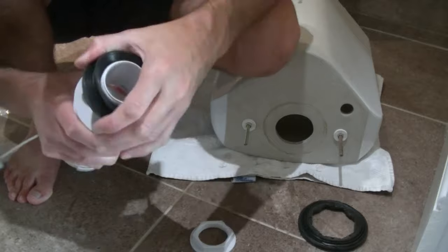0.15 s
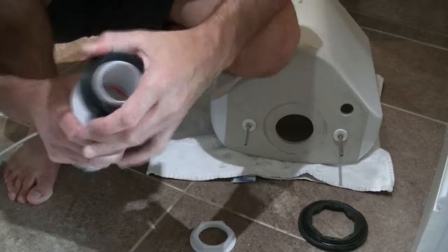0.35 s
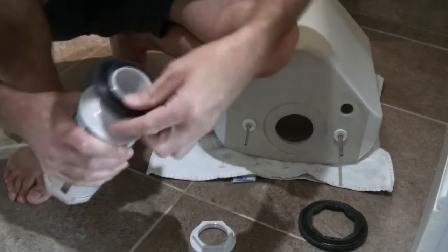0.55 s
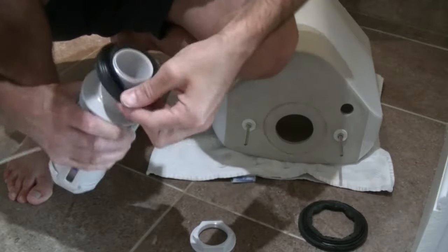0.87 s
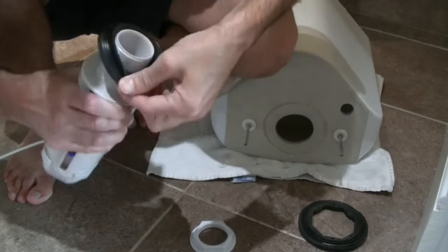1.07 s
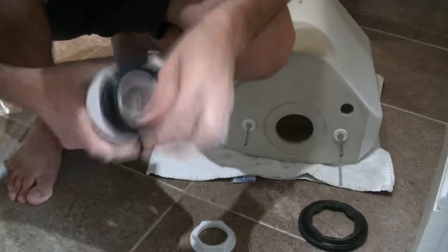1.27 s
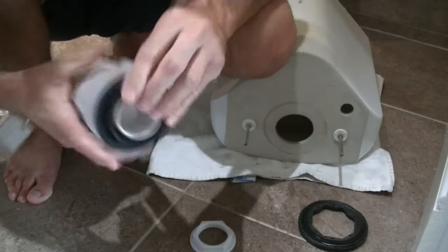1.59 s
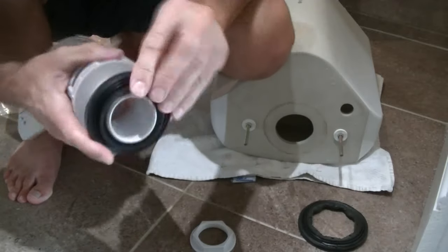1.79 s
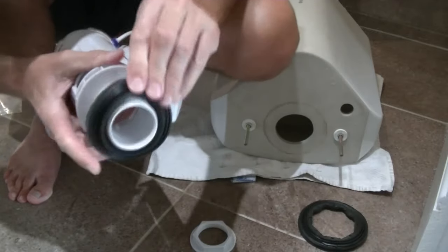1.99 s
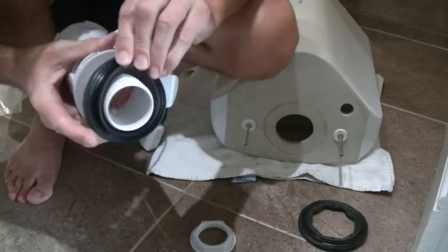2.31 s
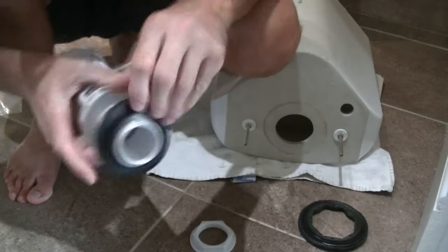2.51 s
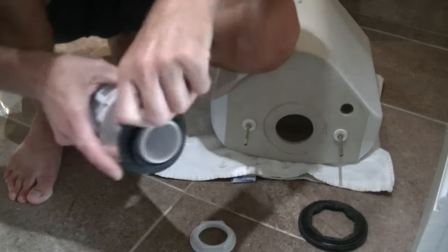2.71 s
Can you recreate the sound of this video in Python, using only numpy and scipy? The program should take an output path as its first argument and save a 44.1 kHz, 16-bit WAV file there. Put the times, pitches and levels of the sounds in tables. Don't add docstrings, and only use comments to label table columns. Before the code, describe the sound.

Close handling of plastic and rubber: an opening clack and rub, scattered ticks, a thick run of hollow clacks and gritty strokes, a quiet gap, then a final burst, with short hard-room reverberation and faint hum.

```python
import sys
import numpy as np
from scipy import signal
from scipy.fft import rfft, irfft
from scipy.io import wavfile
from scipy.ndimage import map_coordinates

SR = 44100
rng = np.random.default_rng(int(sys.argv[2]) if len(sys.argv) > 2 else 0)


def to_wav(s):
    ch = np.atleast_2d(s).T
    pcm = np.round(np.clip(ch, -1, 1) * 32767)
    wavfile.write(sys.argv[1], SR, pcm.astype(np.int16))


def boost_factor(decibels):
    exponent = np.asarray(decibels, float) / 20
    return 10 ** exponent


N = 125685

# start_s, peak_db, ring_hz, brightness_db, mouth_ring_db
FIRM_CLACKS = [(-0.0007, 4, 3650, 2.5, -12), (0.4832, -1, 2890, 2.5, 3), (0.5246, -17, 3900, -4, -6),
               (0.5402, 1, 3750, -6, -2), (0.6472, -1, 3690, 3, 4), (1.1649, -3, 4500, 12, 4),
               (1.1908, -3.5, 3830, -7, 1.5), (1.2292, -3.5, 3020, 11, -5), (1.2412, -3, 4160, -1, -12),
               (1.2727, -7.5, 3760, -4, 14), (1.3917, -1.5, 3130, 8.5, -1.5), (1.4005, -7, 3300, 6, -6),
               (1.5348, -3.5, 3130, -6, 13), (1.6879, -15, 3200, 4, 6), (1.7088, -8.5, 4230, -4, 2),
               (1.82, -7.5, 3590, -0.5, 1), (1.9913, -3, 3440, 2, 13.5), (2.0269, -1, 4990, 18.5, -4),
               (2.0763, 1.5, 2500, 4.5, 0.5), (2.1455, 0.5, 4100, 6, -0.5), (2.5552, -5, 4470, 0, -13),
               (2.5781, -4.5, 2510, -10, 2), (2.5925, -5, 4290, -18, 15)]
# ring_hz, level_db
SECOND_RINGS = [(4920, 3.5), (4130, 17), (3030, 17), (2750, -11), (5460, 5), (5100, -2), (2300, 9),
                (4290, 20), (2830, 15), (4420, 14), (4000, 4), (2840, 21), (3830, -3), (4120, 8), (3740, 6),
                (1890, 6), (4600, 12), (7600, 5), (3400, 12), (1580, 19), (3860, 6), (1940, 5), (2900, 5)]
# start_s, peak_db, ring_hz, brightness_db, mouth_ring_db
LIGHT_TICKS = [(0.1775, -11, 3030, -10, -12), (0.2134, -33, 3220, 3, -2), (0.556, -16, 3940, 6, -3),
               (1.3205, -11.5, 3300, -23, -14), (0.4406, -11.5, 2820, -1, 6), (0.452, -11.5, 2820, -14, 10),
               (1.4165, -9.5, 2850, -12, 4), (1.255, -10, 4300, -13, -9), (1.2915, -9, 3700, 3, 3),
               (0.6711, -23, 3770, -2, -12), (0.728, -8, 2790, -10, -2), (0.7455, -9.5, 3630, -14, -12),
               (0.8928, -27.5, 4450, -19, -11), (0.9775, -30, 3060, -9, 4), (1.0615, -20, 4070, -14, -3),
               (1.7127, -9.5, 4100, -5, 2), (1.0563, -18, 4200, -19, 11), (1.1272, -14, 2920, 13, 3),
               (1.214, -8, 2750, -16, -11), (1.4996, -23, 4270, -8, -8), (1.555, -5, 3900, -3, -2),
               (1.7558, -12, 3580, 8, -5), (2.062, -18, 4960, -8, 8), (2.2262, -7, 4230, -11, 17),
               (2.567, -7.5, 2730, -4, 2), (2.3637, -29, 3700, 6, -4), (2.4148, -26, 2920, -1, 14),
               (2.462, -29, 3540, 0.1, -1), (2.4877, -31, 2370, -18, -1), (2.51, -27.5, 3700, 10, 7),
               (2.6313, -8, 4200, 2, 10.5)]
# start_s, length_s, level_db, brightness_db, thump_db
RUBBER_STROKES = [(0.003, 0.054, -24.5, -14, 0), (0.162, 0.067, -27, -17, -1), (0.238, 0.12, -42.5, -2, 14),
                  (0.412, 0.078, -37, -3, 11), (0.481, 0.083, -22, -5, 3.5), (0.655, 0.071, -26, -10, -2),
                  (0.702, 0.11, -31, -13.5, 0.5), (0.887, 0.026, -34, -18, 10), (1.046, 0.054, -34, -19, 6),
                  (1.206, 0.074, -23, -5, -15), (1.279, 0.055, -21, -7, 5.5), (1.386, 0.043, -18.5, -1, 1),
                  (1.473, 0.1, -28.5, -6, 6), (1.526, 0.034, -17, -4, 6), (1.684, 0.039, -24, -4, 10.5),
                  (1.722, 0.022, -19, 3, 2), (1.749, 0.044, -22, -8, 3.5), (2.072, 0.058, -25, 9.5, 14.5),
                  (2.149, .11, -25, -2.7, 4), (2.32, 0.031, -40.5, -5, 6), (2.41, 0.16, -49, -20, 11),
                  (2.531, 0.055, -29, -5, 12), (2.546, 0.052, -19.5, -3, 1.5),
                  (2.588, 0.036, -21.5, 6.5, 5), (2.834, .05, -47, -36, -11)]
# ring_hz, ring_db, mouth_ring_db
HAND_GRIPS = [(4200, 5, 4.5), (3060, 5.5, 5.5), (1956, 17.5, -12), (2820, 12, 6.5), (2870, 11.5, 6.5),
              (3650, 5.5, -4), (2960, 5, -11), (1905, 17, -10), (2360, 5, -2), (4210, 0.5, 5.5),
              (3190, 12.5, 10.5), (2820, -1, 7.5), (3980, -2, -2), (3930, 3, -6), (3020, 9, 0),
              (3300, 13, -4), (1930, 11.5, -9), (3550, 10, 1), (3690, 2, 4.5), (4230, -2, 0),
              (2100, 10, -7.5), (2540, 7, 6.5), (2450, -2.5, 6), (4290, 4, -6), (1940, -1, -11)]
# pitch_hz, level_db (per Hz)
BODY_COLOUR = [(24, -59), (40, -48.5), (770, -21), (1440, -7.5), (1720, -5), (2100, -3), (3740, -3.5),
               (8550, -18.5), (16000, -28.5)]
# ring_hz, width_hz, level_db
TUBE_RINGS = [(2750, 105, 2.5), (3700, 590, 2.5), (4330, 400, 3), (4990, 1700, 6.5), (7110, 120, 7),
              (8490, 2400, 7.5)]
# pitch_hz, t60_s
ROOM_DECAY = [(300, 0.43), (1300, 0.37), (3500, 0.34), (9000, 0.3), (15000, 0.19)]
# pitch_hz, likeness (0 to 1)
ROOM_ALIKE = [(300, 0.79), (1000, 0.95), (2500, 0.85), (5000, 0.71), (10000, 0.12)]
# pitch_hz, level_db (per Hz)
HUM_COLOUR = [(15, -42), (25, -12), (229, -1.5), (575, -5), (936, -19), (1070, 0), (1940, -8.5), (4370, 0),
              (16000, -23.5)]
# pitch_hz, likeness (0 to 1)
HUM_ALIKE = [(40, 0.36), (150, 0.022), (500, 0.09), (8000, 0.5)]

MOUTH_HZ, MOUTH_WIDTH_HZ = 1750, 530
CONTACT_WIDTH_HZ = 330
SPAN = 32768
HZ = np.fft.rfftfreq(SPAN, 1 / SR)


def clacks():
    rise_s, t60_s, level_db = 0.0006, 0.018, -11.5
    snap_db, own_ring_db, thump_db, wet_db = 19, 13, -5, -1.5
    events = list(FIRM_CLACKS) + list(LIGHT_TICKS)
    start_s, peak_db, ring_hz, bright_db, mouth_db = np.transpose(events)

    t = np.arange(SR // 20) / SR
    shape = (1 - np.exp(-t / rise_s)) ** 3 * boost_factor(-60 * t / t60_s)
    snap_at = shape.argmax()
    noise = rng.standard_normal((len(events), 2, len(t))).swapaxes(0, 1)
    chatter = noise * shape / shape.max()
    chatter[0, :, snap_at] = boost_factor(snap_db)
    drive = boost_factor(peak_db + level_db)[:, None] * chatter

    rings = own_ring_db * bump(ring_hz[:, None], CONTACT_WIDTH_HZ)
    rings += mouth_db[:, None] * bump(MOUTH_HZ, MOUTH_WIDTH_HZ)
    other_hz, other_db = np.transpose(SECOND_RINGS)[..., None]
    rings[:len(FIRM_CLACKS)] += other_db * bump(other_hz, CONTACT_WIDTH_HZ)
    colour = tube_colour(bright_db, np.full(len(events), thump_db), rings)
    return in_room(start_s - snap_at / SR, drive, colour, wet_db)


def rubs():
    slips_per_s, slip_spread_db, slip_s = 450, 10, 0.0017
    hiss_share, clump_db, clumps_per_s = 0.28, 2, 40
    rise_s, fall_s, wet_db = 0.013, 0.024, -0.7
    start_s, length_s, level_db, bright_db, thump_db = np.transpose(RUBBER_STROKES)
    count = len(start_s)

    t = np.arange(SR // 5) / SR
    when, size = rng.random((count, 2, len(t))).swapaxes(0, 1)
    slips = (when < slips_per_s / SR) * boost_factor(-2 * slip_spread_db * size)
    decay = np.exp(-2 / (slip_s * SR))
    slip_power = unit(signal.lfilter([1], [1, -decay], slips) ** 0.5) ** 2
    noise = rng.standard_normal((count, 2, len(t))).swapaxes(0, 1)

    knots = rng.standard_normal((count, 64))
    swell_db = clump_db * np.array([map_coordinates(k, [t * clumps_per_s]) for k in knots])
    stroke = np.minimum(t / rise_s, (length_s[:, None] - t) / fall_s)
    stroke = np.clip(stroke, 0, 1)
    texture = np.sqrt((1 - hiss_share) * slip_power + hiss_share) * noise
    grain = boost_factor(swell_db) * stroke * texture
    stroke_rms = np.sqrt(np.mean(stroke ** 2, axis=1, keepdims=True))
    drive = boost_factor(level_db[:, None]) * unit(grain) * stroke_rms

    ring_hz, ring_db, mouth_db = np.transpose(HAND_GRIPS)[..., None]
    rings = ring_db * bump(ring_hz, CONTACT_WIDTH_HZ)
    rings = rings + mouth_db * bump(MOUTH_HZ, MOUTH_WIDTH_HZ)
    return in_room(start_s, drive, tube_colour(bright_db, thump_db, rings), wet_db)


def tube_colour(bright_db, thump_db, contact_rings_db):
    bright_hz, thump_hz, thump_floor_hz = 5680, 840, 230
    scatter_db = 1.2 * rng.standard_normal((len(bright_db), len(TUBE_RINGS)))
    colour_db = along(BODY_COLOUR, HZ) + contact_rings_db
    for k, (ring_hz, width_hz, level_db) in enumerate(TUBE_RINGS):
        ring_width_hz = max(width_hz, 200)
        colour_db = colour_db + (level_db + scatter_db[:, k, None]) * bump(ring_hz, ring_width_hz)
    colour_db = colour_db + 7 * bump(MOUTH_HZ, 110)
    high = 1 / (1 + (bright_hz / (HZ + 1)) ** 4)
    low = 1 / (1 + (HZ / thump_hz) ** 4) / (1 + (thump_floor_hz / (HZ + 1)) ** 4)
    return causal(colour_db + bright_db[:, None] * high + thump_db[:, None] * low)


def in_room(starts_s, drive, colour, wet_db):
    wall_s, near_alike = 0.005, 0.97
    noise = rng.standard_normal((len(starts_s), 2, SR // 2))
    hz, t, bands = signal.stft(noise, SR, nperseg=256)
    fading = bands * boost_factor(-60 * t / along(ROOM_DECAY, hz)[:, None])
    tail = signal.istft(fading, SR, nperseg=256)[1][..., :SR // 2]
    tail = unit(tail).swapaxes(0, 1) / np.sqrt(SR // 2)
    late_tail = rfft(tail, SPAN) * np.exp(-2j * np.pi * HZ * wall_s)

    spectra = rfft(drive, SPAN)
    alike = along(ROOM_ALIKE, HZ)
    direct = spread(spectra, near_alike * alike ** 0.5)
    reverb = boost_factor(wet_db) * spectra[0] * spread(late_tail, alike)
    pieces = irfft((direct + reverb) * colour, SPAN).swapaxes(0, 1)
    out = np.zeros((2, N + 2 * SPAN))
    for start_s, piece in zip(starts_s, pieces):
        at = SPAN + round(start_s * SR)
        out[:, at:at + SPAN] += piece
    return out[:, SPAN:SPAN + N]


def bump(hz, width_hz):
    return 1 / (1 + (2 * (HZ - hz) / width_hz) ** 2)


def causal(gain_db):
    cepstrum = irfft(gain_db * np.log(10) / 20, SPAN)
    cepstrum[:, 1:SPAN // 2] *= 2
    cepstrum[:, SPAN // 2 + 1:] = 0
    response = np.exp(rfft(cepstrum))
    return response / np.sqrt(np.mean(abs(response) ** 2, axis=1, keepdims=True))


def spread(pair, alike):
    turn = np.arccos(np.clip(alike, -1, 1)) / 2
    middle = pair[0] * np.cos(turn)
    side = pair[1] * np.sin(turn)
    return np.array([middle + side, middle - side])


def along(points, hz):
    f, v = np.transpose(points)
    return np.interp(np.log(hz + 1), np.log(f + 1), v)


def unit(x):
    return x / np.sqrt(np.mean(x ** 2, axis=-1, keepdims=True) + 1e-20)


def hum():
    hz = np.fft.rfftfreq(N, 1 / SR)
    pair = rfft(rng.standard_normal((2, N))) * boost_factor(along(HUM_COLOUR, hz))
    return boost_factor(-53) * unit(irfft(spread(pair, along(HUM_ALIKE, hz)), N))


def scene():
    left_db = 0.62
    balance = boost_factor(np.array([[left_db], [-left_db]]))
    return (clacks() + rubs()) * balance + hum()


def band_limit(x):
    return signal.sosfilt(signal.butter(12, 16270, fs=SR, output="sos"), x)


def record(dry):
    top = 1.1
    mix = dry / (1 + abs(dry / top) ** 10) ** (1 / 10)
    return band_limit(mix)


dry = scene()
out = record(dry)
to_wav(out)
```